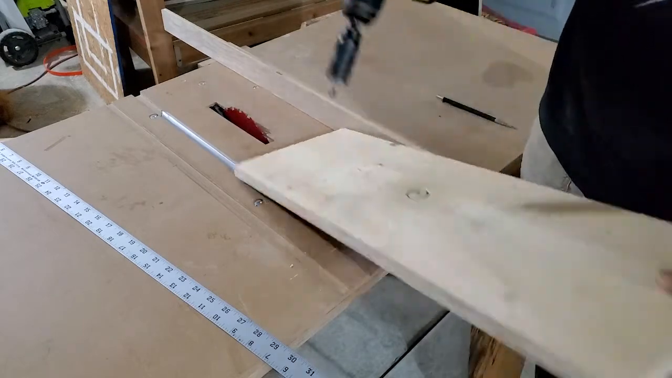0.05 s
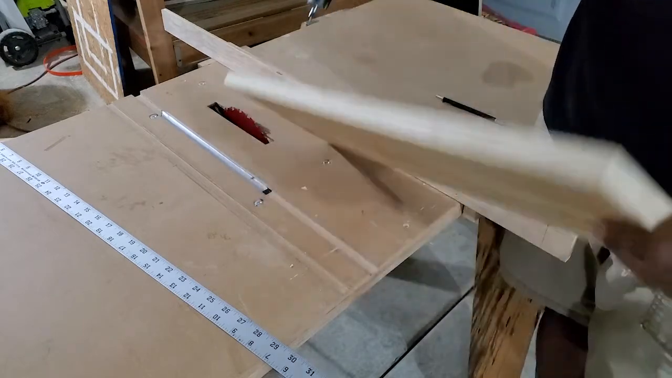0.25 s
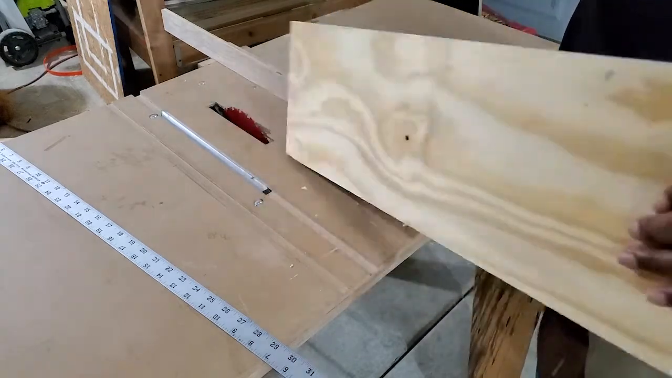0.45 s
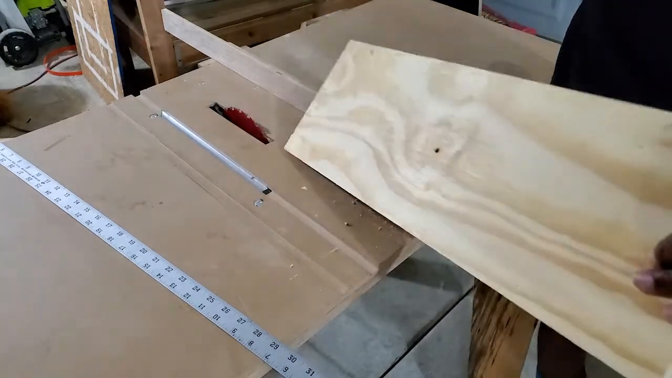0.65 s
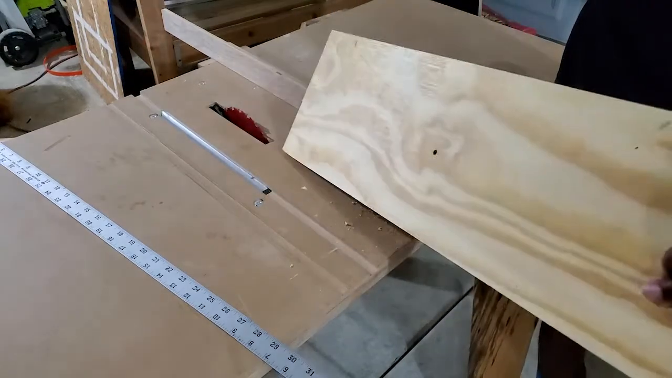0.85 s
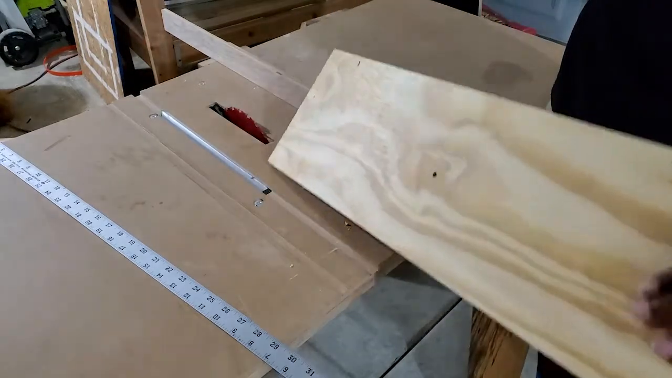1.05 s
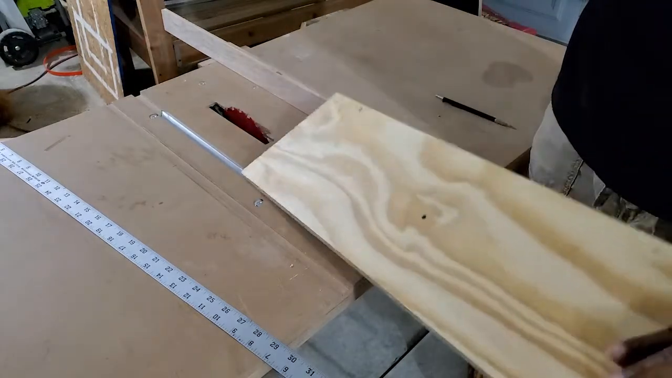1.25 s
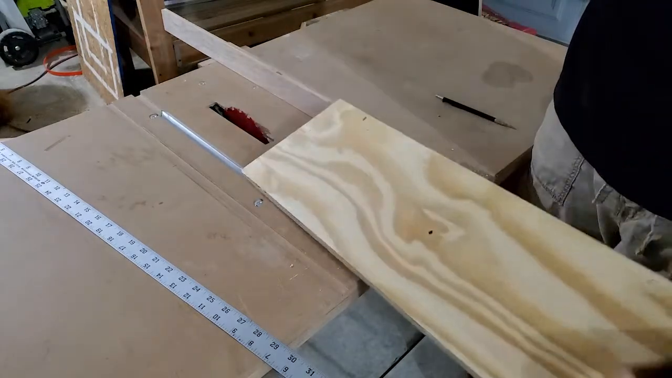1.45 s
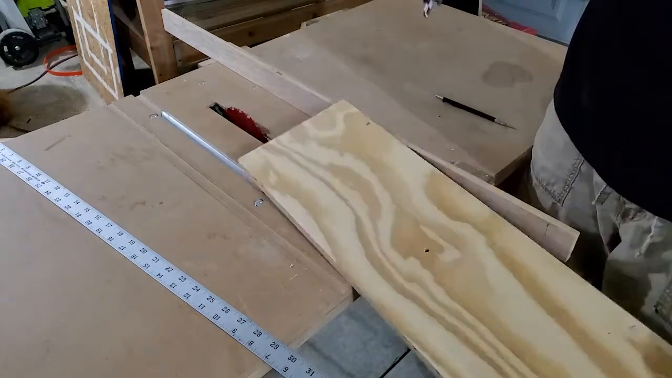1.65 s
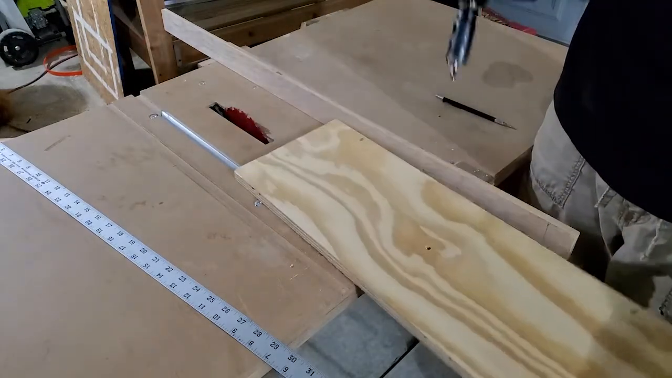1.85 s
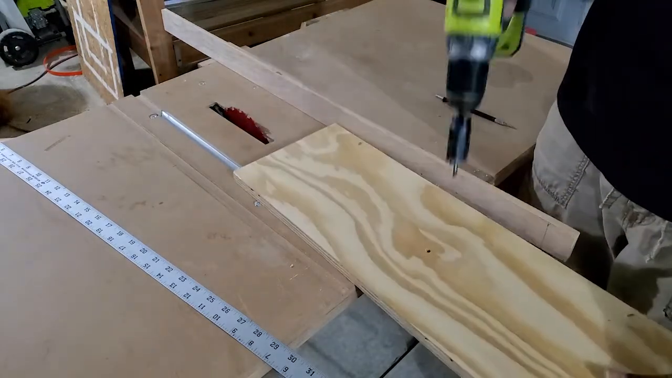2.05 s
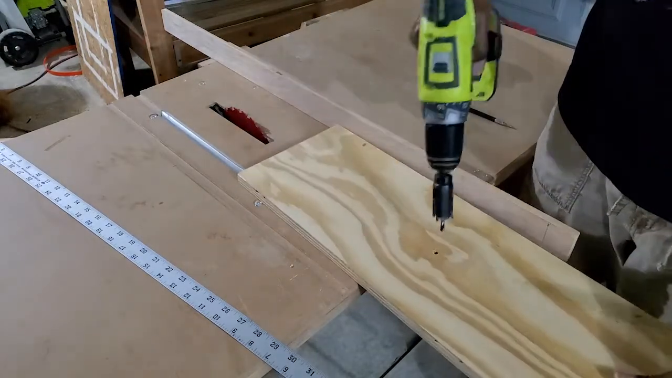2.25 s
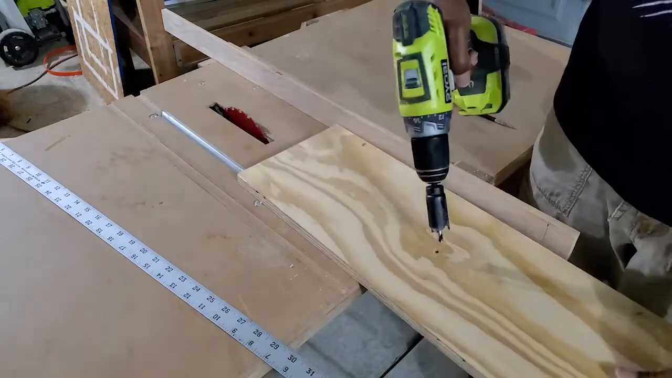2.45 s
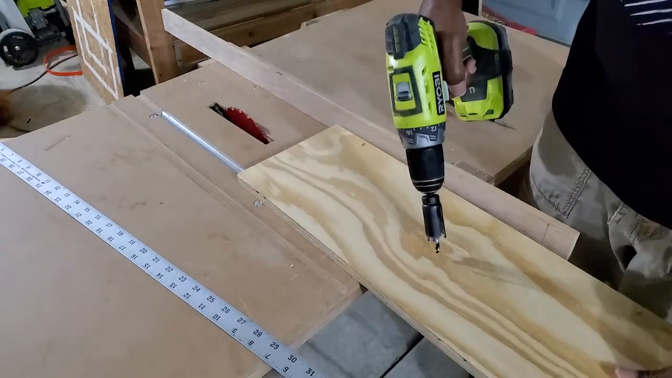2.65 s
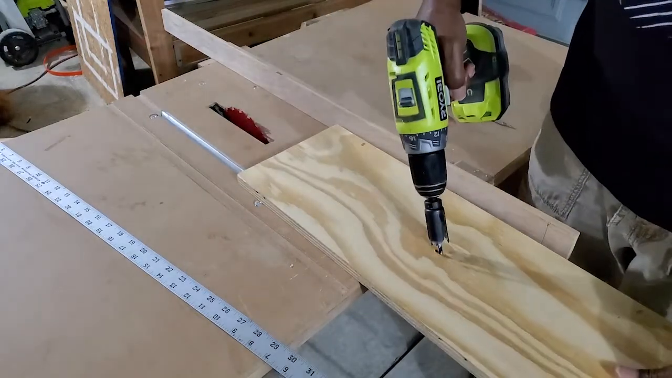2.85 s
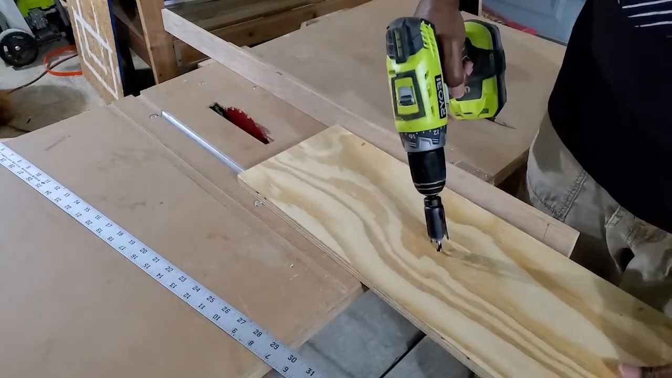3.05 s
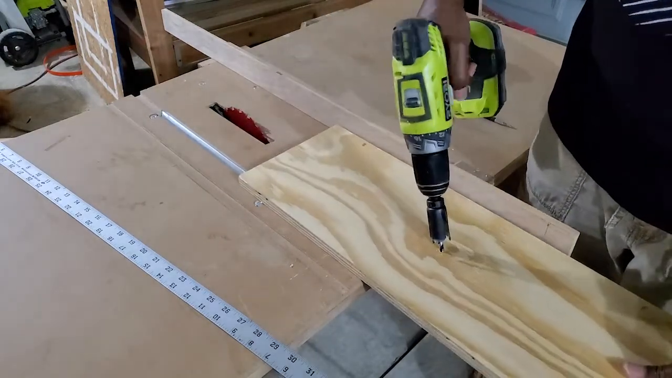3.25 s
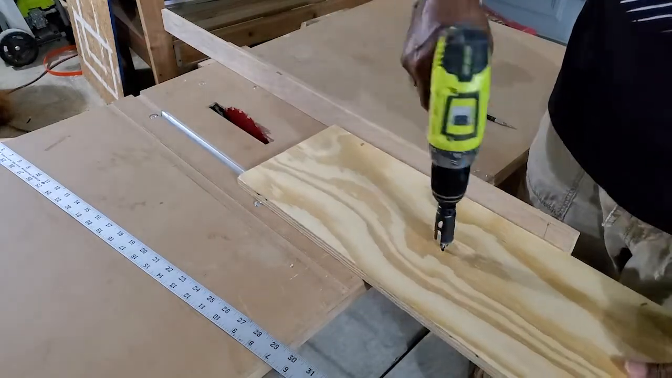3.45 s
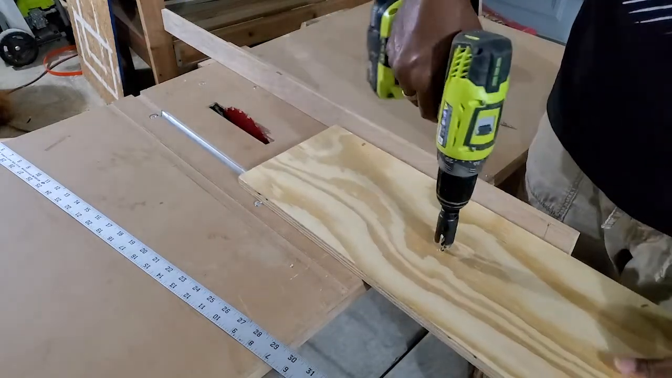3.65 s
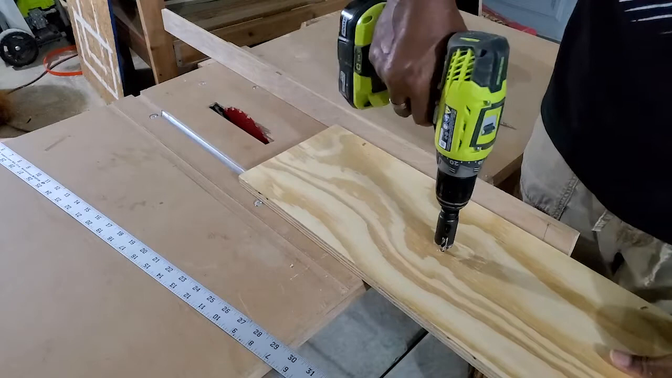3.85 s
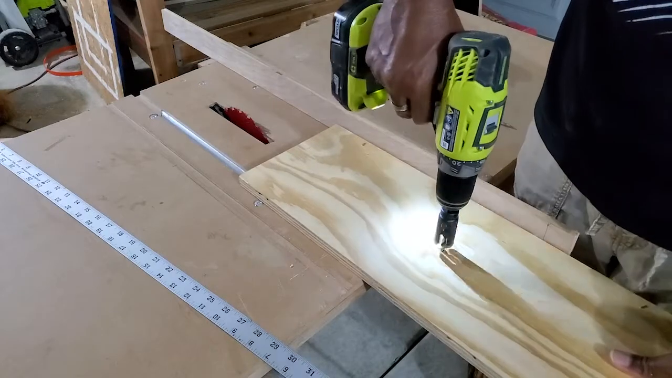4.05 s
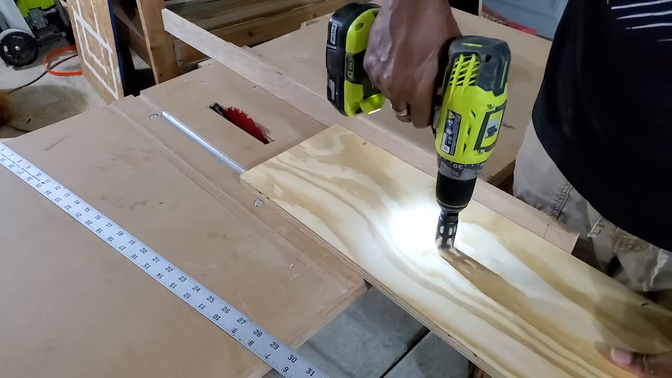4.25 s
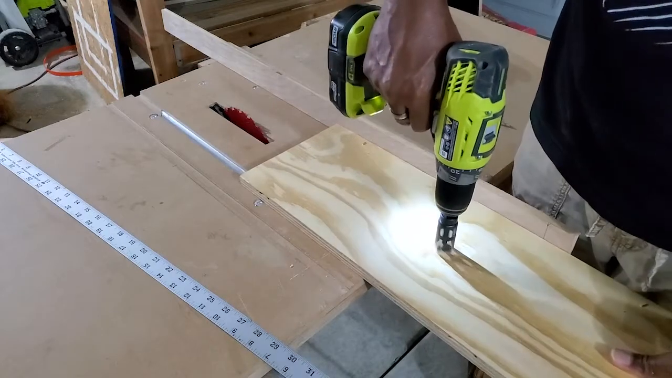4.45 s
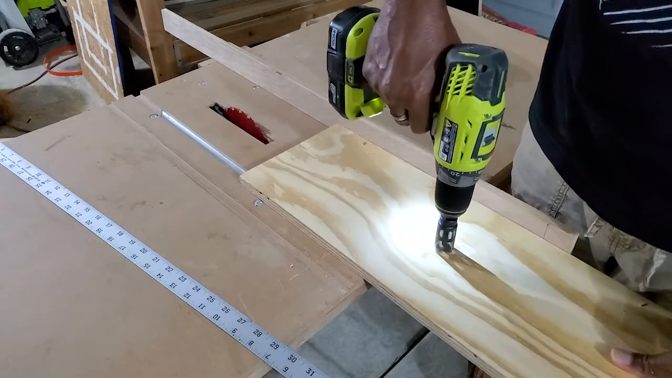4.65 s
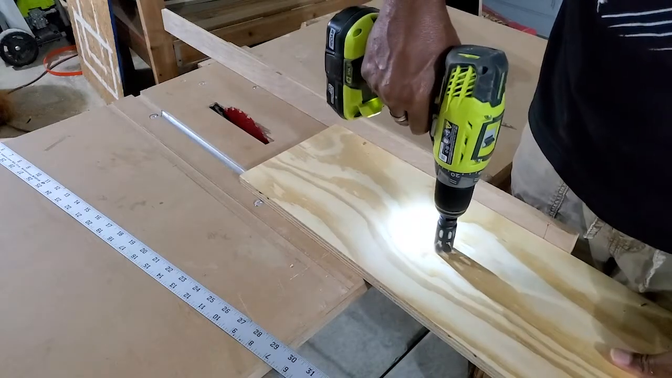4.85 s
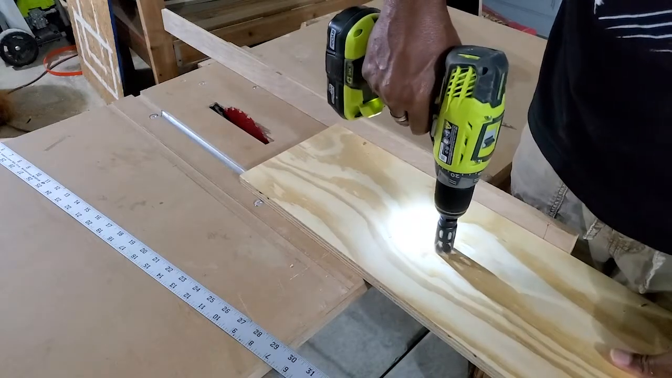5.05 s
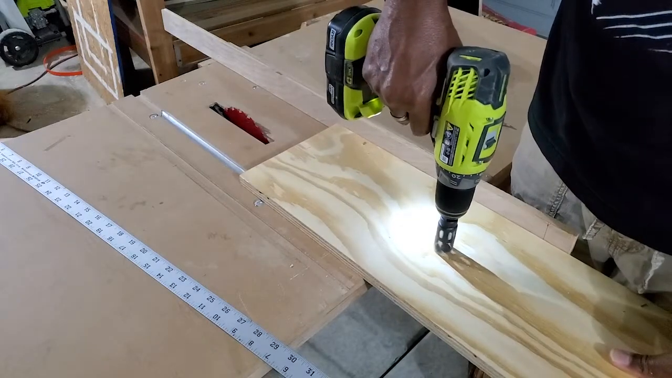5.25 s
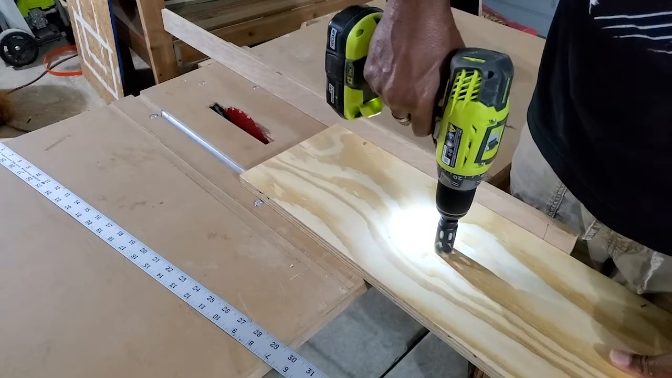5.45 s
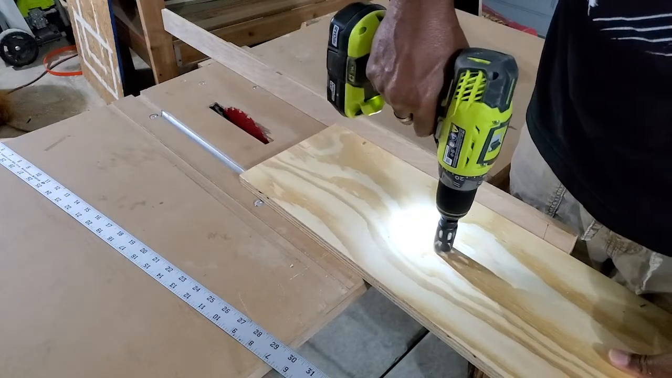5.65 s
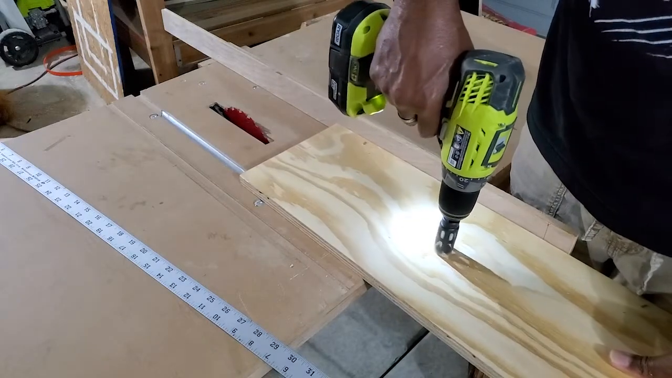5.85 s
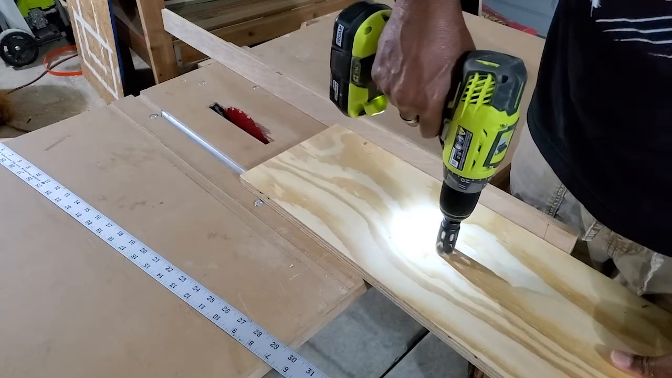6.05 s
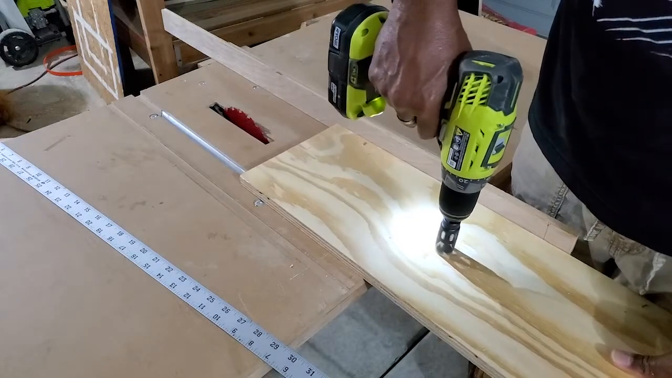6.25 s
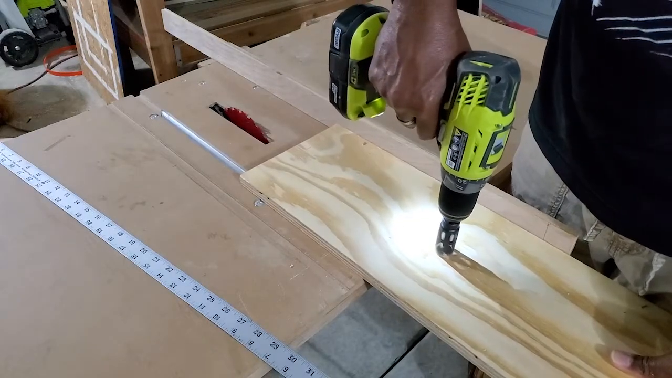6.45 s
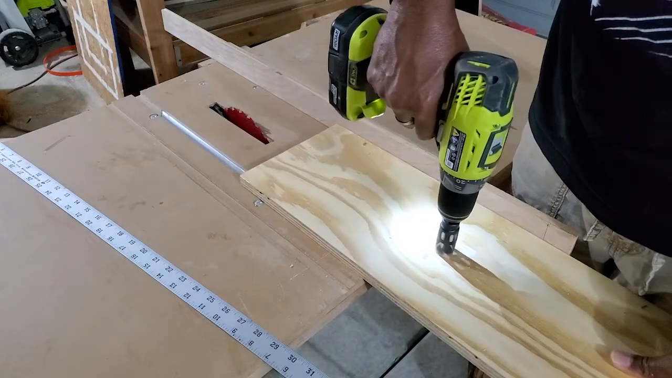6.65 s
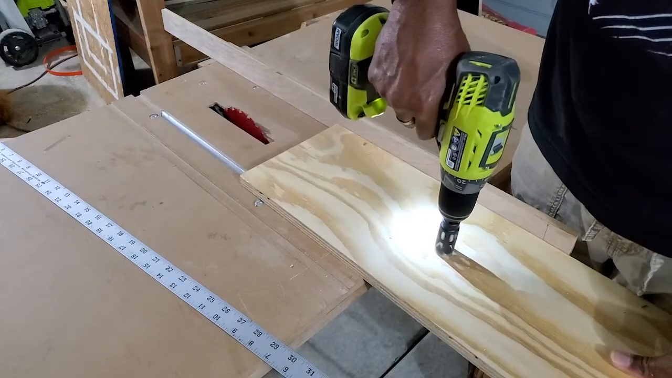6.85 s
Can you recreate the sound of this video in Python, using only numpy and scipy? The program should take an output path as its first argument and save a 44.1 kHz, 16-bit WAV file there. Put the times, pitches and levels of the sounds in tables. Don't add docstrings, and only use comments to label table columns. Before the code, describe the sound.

Wood slides, knocks and cracks down on a bench, near-quiet follows, then an electric drill whirs up and grinds steadily through the plank.

```python
import sys
import numpy as np
from scipy import signal
from scipy.fft import rfft, irfft, next_fast_len
from scipy.io import wavfile
from scipy.ndimage import uniform_filter1d, map_coordinates

SR = 44100
rng = np.random.default_rng(int(sys.argv[2]) if len(sys.argv) > 2 else 0)


def file_out(sig):
    cols = np.atleast_2d(sig).T
    lim = np.clip(cols, -1, 1)
    pcm = np.round(lim * 32767).astype(np.int16)
    wavfile.write(sys.argv[1], SR, pcm)


def amplitude_ratio(level_db):
    exponent = np.asarray(level_db, float) / 20
    return 10 ** exponent


N = 304731

# frequency in Hz, density in dB per Hz.
TRAFFIC = [(18, -63.5), (30, -39.5), (49, -7), (90, -19), (102, -7), (123, -6.5), (148, -12), (187, -5),
           (270, -19), (332, -15), (591, -22.5), (747, -28.5), (2360, -47), (2550, -47), (15500, -70)]
# frequency in Hz, level in dB.
MAINS_HUM = [(59.5, -79.5), (119, -84.5), (178.5, -69.5), (3330, -101)]
# frequency in Hz, t60 in seconds.
GARAGE = [(100, .75), (500, .52), (2000, .53), (4000, .36), (7000, .18), (14000, .2)]
# frequency in Hz, likeness from 0 to 1.
ALIKE = [(60, 0.97), (200, 1), (400, 0.54), (800, 0.051), (1500, 0.026)]

# peak in seconds, rise in seconds, fall in seconds, scrape in dB, weight in dB.
STROKES = [(.005, 0.036, 0.25, -59.5, 0.5), (0.186, 0.05, 0.19, -56.5, 14), (.237, .03, 0.11, -60, 16.5),
           (0.292, 0.107, 0.084, -39.5, -4), (.316, 0.038, 0.063, -37.5, -7),
           (.38, 0.052, 0.04, -42, -17.5), (.43, .07, .04, -52, -16), (.47, 0.068, 0.18, -60.5, -16),
           (0.841, .06, 0.029, -55.5, -12), (.96, 0.05, 0.5, -48, -15), (1.08, 0.13, 0.11, -53, -16),
           (1.012, 0.052, 0.028, -45.5, 2), (1.126, 0.21, 0.12, -53, -22.5), (1.19, 0.024, 0.055, -44, 16),
           (1.377, 0.23, 0.046, -65, 26.5), (1.54, 0.04, 0.1, -63.5, 1), (1.606, 0.022, 0.11, -44.5, 13.5),
           (1.68, .08, 0.058, -44, 5.5), (1.75, 0.033, 0.3, -55, 22.5), (1.82, 0.016, 0.018, -45, -1.5),
           (1.857, 0.06, 0.087, -47, 11), (2.041, 0.04, 0.077, -57, -9.5), (2.275, 0.028, 0.028, -76, -12),
           (2.36, .1, 0.16, -84.5, -3), (3.069, 0.029, 0.24, -76, 2), (3.31, 0.045, 0.57, -70, 0.5),
           (3.515, 0.15, 0.083, -66.5, -1.5), (3.624, 0.16, .05, -72, -2), (3.966, 0.021, 0.084, -71, -13)]
# frequency in Hz, width in Hz, level in dB.
SLIDING = [(310, 50, -7), (430, 40, 2), (720, 80, -7), (1030, 70, -5), (1210, 70, -4), (1440, 60, -2),
           (1700, 90, -4), (1930, 120, -6), (2320, 120, -4), (2900, 90, -6), (4000, 120, -6),
           (4350, 100, -8)]
# frequency in Hz, width in Hz, level in dB.
LANDED = [(245, 100, 1.5), (446, 40, -1), (689, 30, -3), (800, 30, -6.5), (1200, 87, -8.5),
          (1440, 60, -6.5), (2000, 500, -18)]
# frequency in Hz, width in Hz, level in dB.
SETTLING = [(423, 43, -3), (798, 30, -1), (1261, 120, -4), (1780, 120, -5), (2300, 250, -9),
            (3030, 200, -14), (3944, 150, -16)]
# frequency in Hz, width in Hz, level in dB.
GRIP = [(1180, 60, -7), (1840, 60, -5), (2450, 200, -2), (3450, 150, -6), (4050, 250, -10)]
# frequency in Hz, density in dB per Hz.
DUST = [(2000, -30), (3000, -9), (4000, -17), (5500, -7.5), (7000, -12.5), (8700, -27), (11500, -19),
        (13500, -17.5), (16000, -16)]
DUST_DB = [-19.5, -29, -29.5, -8.5]
# start in seconds, length in seconds, frequency in Hz, level in dB rms.
GROANS = [(.178, 0.039, 428, -47), (.215, 0.041, 423, -50.5), (.225, 0.031, 306.4, -52),
          (.265, 0.057, 427.3, -50), (.283, .025, 1460, -47), (.372, 0.019, 1420, -47),
          (.95, 0.096, 420, -59.5), (1.36, 0.084, 800, -55.5), (2.56, .15, 120, -65.5),
          (2.715, 0.16, 1847, -93), (3.445, 0.027, 1180, -75), (3.74, .02, 2064, -85)]

# time in seconds, tick peak in dB, knock peak in dB, bright edge peak in dB.
KNOCKS = [(0.2942, -37, -49, -78), (0.3842, -33, -56, -66), (0.611, -64, -61, -85),
          (0.9857, -42, -44.5, -51), (1.164, -36, -44, -67), (1.1676, -24.5, -13.5, -42.5),
          (1.1745, -44, -21.5, -71), (1.1813, -44, -27, -70.5), (1.2195, -45, -37, -69),
          (1.3232, -42, -38, -65), (1.3645, -48.5, -31, -80), (1.5155, -72, -62, -82),
          (1.587, -35.5, -16, -59), (1.6576, -42.5, -30, -52), (1.6866, -50, -33, -73.5),
          (1.7085, -35, -18, -57), (1.7439, -38.5, -31, -69), (1.7684, -39, -29, -66),
          (1.8194, -27, -32.5, -57), (1.838, -53, -34.5, -65), (1.8492, -31, -27, -58),
          (1.8774, -43, -46, -53.5), (2.709, -72, -59, -97.5), (3.056, -70, -76.5, -82),
          (3.0824, -70.5, -67.5, -94.5), (3.0994, -75.5, -82, -65.5), (3.2083, -69, -72.5, -93),
          (3.2742, -78, -80, -91), (3.2927, -72, -72.5, -81), (3.3076, -63, -75, -78),
          (3.4554, -56, -60, -86.5), (3.477, -60.5, -70.5, -89), (3.52, -63.5, -77, -67),
          (3.5441, -66, -76.5, -78), (3.644, -69, -72, -80.5), (3.7523, -70, -71.5, -97),
          (4.0022, -52, -70, -63), (4.013, -36.5, -70, -52)]
# frequency in Hz, level in dB, t60 in seconds.
BOARD_MODES = [(102.5, -20, 0.18), (170, -5.5, 0.086), (258, -14.5, 0.2), (450.5, 6, 0.1), (588, 3.5, 0.16),
               (695, -1, 0.35), (765, -2, 0.15), (1300, -4.5, 0.17)]
# frequency in Hz, level in dB, t60 in seconds.
FLAT_MODES = [(105.6, -5, 0.23), (151, -6, 0.12), (233, 1, 0.11), (352, -7.5, .15), (440, 10.5, 0.066),
              (563, -4.5, 0.41), (689, -2.5, .2), (820, -11.5, .15), (1250, -15, .12)]
# time in seconds, frequency in Hz, peak in dB; then the peak in dB of a brief sharp
CLACK = (1.78923, 2100, -10, -10)
# frequency in Hz, level in dB, t60 in seconds.
CLACK_RING = (1800, -27.5, .04)

# time in seconds, motor effort in dB, feed pressure in dB.
BORE = [(3.99, -82, -75), (4.012, -51.5, -55), (4.07, -45.5, -59), (4.18, -45, -47.5), (4.3, -37.5, -59),
        (4.4, -39, -65.5), (4.6, -40.5, -60), (4.8, -37.5, -48.5), (5.05, -37.5, -44.5), (5.15, -37, -38.5),
        (5.45, -35.5, -39.5), (5.75, -36.5, -41.5), (5.93, -37, -46.5), (6.05, -36, -39), (6.3, -35, -35),
        (6.6, -35, -34.5), (6.91, -34.5, -33.5)]
# time in seconds, base order in Hz.
GEARS = [(4.26, 590), (4.31, 635), (4.38, 667), (4.45, 615), (4.55, 535), (4.67, 480), (4.7, 605),
         (4.78, 655), (4.92, 683), (5.05, 680), (5.35, 662), (5.5, 652), (5.7, 652), (5.9, 666),
         (6.05, 667), (6.4, 662), (6.91, 644)]
# time in seconds, frequency in Hz, level in dB.
SQUEAL = [
    (4.09, 3720, -62),
    (4.14, 4000, -52),
    (4.175, 4310, -48),
    (4.22, 4420, -51),
    (4.245, 4500, -68),
]
# frequency in Hz, density in dB per Hz.
HISS = [(1470, -8.5), (1900, -2.5), (2500, -4), (3020, -3.5), (3680, -4), (4110, 2), (5330, -4.5),
        (6550, -2.5), (8370, -4), (9720, -6), (13500, -3.5), (15400, -6), (16100, -37), (16500, -46.5)]
# frequency in Hz, width in Hz, level in dB.
HOUSING = [(4070, 200, -6), (4350, 500, -7), (9870, 110, 0), (11860, 900, -14.5)]
# frequency in Hz, width in Hz, share taken away in dB.
HOUSING_GAP = (3820, 260, -5)
SPIN_UP_S = (4.01, 4.14)
# frequency in Hz, density in dB per Hz.
RASP = [(150, -39), (250, 15.5), (420, 7), (530, -10), (592, -6), (746, -8.5), (1870, -3.5), (3500, -10.5),
        (4550, -34), (7700, -120)]
# frequency in Hz, density in dB per Hz.
THRUM = [(18, -40), (30, -27), (76, -24), (146, 2), (231, -30), (300, -5), (390, 7), (660, -120)]
# multiple of the chuck turn, level in dB.
SHALLOW = [(1, -33), (2, -25), (3, -6), (4, -11), (5, -14), (6, -8), (7, -10), (8, -11), (9, -15),
           (10, -20), (11, -17), (12, -18), (13, -14), (14, -14), (15, -13), (16, -1), (17, -10), (18, -3),
           (19, 0), (20, -3), (21, -7), (22, -19), (23, -14), (24, -19), (25, -7), (26, -7), (27, -13),
           (28, -16), (29, -20), (30, -18)]
# multiple of the chuck turn, level in dB.
DEEP = [(1, -40), (2, -15), (3, -10), (4, -19), (5, -11), (6, 0), (7, -11), (8, -11), (9, -10), (10, -10),
        (11, -22), (12, -19), (13, -18), (14, -17), (15, -8), (16, -9), (17, -13), (18, -3), (19, -11),
        (20, -14), (21, -10), (22, -24), (23, -19), (24, -23), (25, -14), (26, -5), (27, -16), (28, -24),
        (29, -20), (30, -21)]
# frequency in Hz, width in Hz, level in dB.
PLANK = [(420, 90, -4), (600, 40, -6), (790, 25, -7), (1023, 35, -3), (1350, 55, -7), (1690, 90, -8),
         (1875, 130, -2), (2155, 45, -6), (2660, 150, -10)]
# peak in seconds, rise in seconds, fall in seconds, level in dB.
SHUDDERS = [
    (4.14, 0.038, 0.085, -42),
    (4.81, 0.17, 0.16, -45.5),
    (5.15, 1, 0.45, -44.5),
    (5.7, 0.24, 0.42, -45.5),
    (6.3, 0.41, 0.6, -35.5),
    (6.57, 0.47, 0.26, -36),
]
# start in seconds, length in seconds, frequency in Hz, level in dB rms.
LOCKS = [(4.98, 0.26, 69.5, -51), (5.05, 0.21, 472, -45), (5.08, 0.22, 372, -48.5), (5.15, 0.16, 445, -44),
         (5.33, 0.16, 426, -44), (5.24, 0.19, 605, -47.5), (5.56, 0.23, 415, -48), (5.98, .17, 370, -45.5),
         (5.98, 0.11, 418.5, -47), (6.0, 0.44, 600, -49), (6.14, 0.28, 138.4, -38.5),
         (6.44, .25, 138.4, -39), (6.33, 0.42, 69.2, -46), (5.62, .5, 47, -57), (6.35, .45, 46, -56),
         (6.22, 0.3, 415, -40.5), (6.36, .4, 230, -46), (6.52, 0.1, 366, -42), (6.66, 0.16, 480, -44.5),
         (6.74, 0.25, 405, -47)]
# time in seconds, peak in dB.
SNAGS = [(4.63, -28), (5.089, -30), (5.135, -29), (5.176, -29), (5.218, -33), (5.287, -31), (5.352, -32),
         (5.439, -30), (5.5, -31), (5.639, -16.5), (5.686, -20), (5.73, -25), (5.771, -24), (5.817, -28),
         (5.902, -28), (5.986, -33), (6.031, -27), (6.113, -25), (6.29, -33), (6.384, -33), (6.497, -27),
         (6.632, -29), (6.737, -29), (6.785, -37), (6.847, -26), (6.888, -36)]
# frequency in Hz, level in dB, t60 in seconds.
SNAG_RING = [(420, 0, .06), (470, -5, .05), (365, -9, .05)]
# frequency in Hz, width in Hz, share taken away in dB.
PORT_DIP = (8500, 2400, -11)


def unit(x):
    return x / np.sqrt(np.mean(x ** 2) + 1e-20)


def along(points, hz):
    f, v = np.transpose(points)
    return np.interp(np.log(hz + 1), np.log(f + 1), v)


def spectrum(points):
    return lambda f: amplitude_ratio(along(points, f))


def curves(rows):
    s, *cols = np.transpose(rows)
    return [np.interp(np.arange(N) / SR, s, c) for c in cols]


def during(rows):
    t = np.arange(N) / SR
    return np.clip(np.minimum(t - rows[0][0], rows[-1][0] + .01 - t) * 200, 0, 1)


def wobble(rate):
    knots = rng.standard_normal(int(N * rate / SR) + 4)
    return map_coordinates(knots, [np.arange(N) * rate / SR], order=1)


def swells(rows):
    t = np.arange(N) / SR
    return np.sqrt(sum(amplitude_ratio(2 * db - 40 * np.maximum((s - t) / rise, (t - s) / fall))
                       for s, rise, fall, db in rows))


def filtered(x, response):
    m = next_fast_len(x.shape[-1] + SR // 2)
    return irfft(rfft(x, m) * response(np.fft.rfftfreq(m, 1 / SR)), m)[..., :x.shape[-1]]


def resonances(peaks, base=0):
    def response(f):
        power = sum(amplitude_ratio(2 * db) * (f * w) ** 2 / ((c * c - f * f) ** 2 + (f * w) ** 2) for c, w, db in peaks)
        return np.sqrt(base ** 2 + power)
    return response


def band(lo_hz, hi_hz):
    return lambda f: 1 / np.sqrt((1 + (lo_hz / (f + 1)) ** 4) * (1 + (f / hi_hz) ** 4))


def noise(*responses, gate=1):
    raw = gate * rng.standard_normal(N)
    return unit(filtered(raw, lambda f: np.prod([r(f) for r in responses], axis=0)))


def hums(rows, edge_s, waver):
    t, rate = np.arange(N) / SR, 1 / edge_s / 2
    out = np.zeros(N)
    for s, length, hz, db in rows:
        inside = np.clip(np.minimum(t - s, s + length - t) / edge_s + .5, 0, 1)
        swell = amplitude_ratio(db + 2 + 1.2 * wobble(rate)) * np.sin(np.pi / 2 * inside) ** 2
        out += swell * np.sin(2 * np.pi * hz * t + waver * wobble(rate))
    return out


def diffuse(pair):
    turn = lambda hz: np.arccos(np.clip(along(ALIKE, hz), -1, 1)) / 2
    mid, side = filtered(pair, lambda hz: np.array([np.cos(turn(hz)), np.sin(turn(hz))]))
    return np.array([mid + side, mid - side])


def garage(x, wet_db, lag_s, pan_db, count=1):
    turn_s = .3
    out = filtered(x, lambda f: np.exp(-1j * np.pi * f * lag_s * np.array([[1], [-1]])))
    out = out * amplitude_ratio([[pan_db / 2], [-pan_db / 2]])
    for k in range(count):
        hz, t, z = signal.stft(rng.standard_normal((2, SR)), SR, nperseg=256)
        decay = amplitude_ratio(-60 * t / along(GARAGE, hz)[:, None])
        tail = diffuse(signal.istft(z * decay, SR, nperseg=256)[1])
        tail = np.pad(tail / np.linalg.norm(tail[0]), ((0, 0), (180, 0)))
        away = np.abs((np.arange(N) / SR / turn_s - k) % count - 1)
        turn = np.cos(np.pi / 2 * np.clip(away, 0, 1)) if count > 1 else 1
        out = out + amplitude_ratio(wet_db) * signal.fftconvolve((turn * x)[None], tail, axes=1)[:, :N]
    return out


def rocking(x, depth_db):
    z = signal.stft(x, nperseg=512)[2]
    field = uniform_filter1d(rng.standard_normal(z.shape[1:]), size=3, axis=0)
    field = uniform_filter1d(field, size=5, axis=1)
    gain = amplitude_ratio(depth_db * unit(field) - depth_db ** 2 * np.log(10) / 20)
    return signal.istft(z * gain, nperseg=512)[1][:, :N]


def street():
    near_db, far_db, leaves_s, fade_s = -61, -66, 1.2, 0.93
    pair = np.array([noise(spectrum(TRAFFIC), resonances([(5870, 1300, 2)], base=0.7)) for _ in "LR"])
    hum = sum(amplitude_ratio(db + 1.1 * wobble(0.84)) * np.sin(2 * np.pi * hz * np.arange(N) / SR)
              for hz, db in MAINS_HUM)
    level_db, = curves([(leaves_s, near_db), (leaves_s + fade_s, far_db)])
    return amplitude_ratio(level_db + 2 + 2 * wobble(8)) * unit(diffuse(pair)) + hum


def slides():
    dust_drops, boom_db, shuffle_db = 0.9, -3.5, -85.5
    layer = lambda per_db: swells([(s, rise, fall, db + per_db * weight_db)
                                   for s, rise, fall, db, weight_db in STROKES])
    grit = amplitude_ratio(3 * wobble(300) + 2.5 * wobble(40))
    lumps = amplitude_ratio(4 * wobble(60))
    stage = np.searchsorted([1.16 * SR, 1.55 * SR, 2.15 * SR], np.arange(N))
    body = np.choose(stage, [noise(resonances(p, base=.15), band(200, 1100), band(170, 1100), gate=lumps)
                             for p in (SLIDING, LANDED, SETTLING, SETTLING)])
    scrape = np.choose(stage, [noise(resonances(p, base=.25), band(900, 8000), band(1, 5600), gate=grit ** 1.3)
                               for p in (SLIDING, LANDED, SETTLING, GRIP)])
    dust = amplitude_ratio(DUST_DB)[stage] * noise(spectrum(DUST), band(3000, 20000), gate=grit)
    on_bench = (stage == 1) | (stage == 2)
    boom = on_bench * amplitude_ratio(boom_db) * noise(band(55, 280), band(55, 280))
    heavy = layer(0.9)
    wood = (heavy + amplitude_ratio(shuffle_db)) * body + heavy * boom + layer(0) * scrape
    return amplitude_ratio(-2.0) * wood + layer(-dust_drops) * dust


def knocks():
    blow_db, blow_s = 8, .003
    out, t = np.zeros((2, N + SR)), np.arange(SR // 4) / SR
    peak = lambda db, x: amplitude_ratio(db) * x / np.abs(x).max()
    for s, tick_db, knock_db, edge_db in KNOCKS:
        modes = FLAT_MODES if 1.1 < s < 1.5 else BOARD_MODES
        ring = sum(amplitude_ratio(db + 2 * rng.standard_normal() - 60 * t / (0.37 * t60)) * np.sin(2 * np.pi * hz * t)
                   for hz, db, t60 in modes)
        burst = 2.9 * amplitude_ratio(-60 * t / 0.051) * rng.standard_normal(len(t))
        ring = ring + filtered(burst, lambda f: band(350, 1100)(f) ** 2)
        ring = ring * (1 + amplitude_ratio(blow_db) * np.exp(-(t / blow_s) ** 2))
        thud = peak(knock_db + 1.5, -ring * (1 - np.exp(-t / 0.0026)))
        touched = SLIDING if s < 1.1 else SETTLING if s < 2.15 else GRIP
        body = resonances([(hz, 3 * width, db) for hz, width, db in touched], base=.2)
        grit = amplitude_ratio(-60 * t / np.array([[.02], [.006]])) * rng.standard_normal((2, len(t)))
        tick = peak(tick_db - 1.5, filtered(grit[0], lambda f: band(900, 4500)(f) ** 2 * body(f)))
        edge = peak(edge_db + 5.5, filtered(grit[1], band(3500, 13000)))
        out[:, round(s * SR):][:, :len(t)] += [thud, tick + edge]
    return out[:, :N]


def clack():
    falls = 1400000
    s, hz, db, spike_db = CLACK
    t = np.arange(N) / SR - s
    chirp = np.cos(2 * np.pi * (hz * t - falls * np.clip(t, -.001, .0004) ** 2))
    wood = -amplitude_ratio(db) * np.exp(-(t / .00036) ** 2) * chirp
    ring_hz, ring_db, t60 = CLACK_RING
    after = np.clip(t - .0015, 0, None)
    wood = wood + amplitude_ratio(ring_db - 60 * after / t60) * np.sin(2 * np.pi * ring_hz * after)
    click = 1. * (np.arange(N) == round(s * SR))
    spike = filtered(click, lambda f: band(2400, 20000)(f) / np.sqrt(1 + (f / 12000) ** 40))
    spike = amplitude_ratio(spike_db) * spike / spike.max() * [[.06], [1]]
    return garage(wood, wet_db=-12, lag_s=.00003, pan_db=0) + spike


def touch():
    t = np.clip(np.arange(N) / SR - 2.708, 0, None)
    return amplitude_ratio(-48 - 60 * t / .12) * np.sin(2 * np.pi * 200 * t)


def housing_hiss(beat):
    load, = curves([(4.62, 0.45), (4.8, 0.7), (5.5, 0.91)])
    free = noise(spectrum(HISS), lambda f: 1 - 0.73 * np.abs(resonances([(4200, 700, 0)])(f)))
    gap = lambda f: 1 - np.abs(resonances([HOUSING_GAP])(f))
    ringing = noise(spectrum(HISS), resonances(HOUSING, base=0.36), gap, gate=beat ** 0.37)
    hiss = load * ringing + np.sqrt(np.abs(1 - load ** 2)) * free
    low = filtered(hiss, band(0.89, 4500))
    high_db, = curves([(SPIN_UP_S[0], -12), (SPIN_UP_S[1], 0)])
    return low + (hiss - low) * amplitude_ratio(high_db)


def chip_rasp(beat):
    return noise(spectrum(RASP), band(800, 2800), resonances(PLANK, base=.35), gate=beat ** .7)


def bit_in_board(turn, beat):
    depth, = curves([(5.6, 0.025), (6.1, 0.61)])
    orders = [amplitude_ratio(db + depth * (deep_db - db) + 2.5 * wobble(5)) * np.sin(k * turn + wobble(5))
              for (k, db), (_, deep_db) in zip(SHALLOW, DEEP)]
    thrum = 0.53 * unit(sum(orders[:13])) + 0.25 * noise(spectrum(THRUM))
    tearing = noise(resonances(PLANK, base=.12), band(310, 700), gate=beat)
    return thrum, .8 * unit(sum(orders[13:])) + .6 * tearing


def squeal():
    hz, db = curves(SQUEAL)
    phase = 2 * np.pi * np.cumsum(hz) / SR
    upper = np.clip((hz - 3900) / 150, 0, 1) * np.sin(phase)
    return during(SQUEAL) * amplitude_ratio(db + 6.5) * (upper + 1.6 * np.sin(.528 * phase))


def gear_whine(base_hz, shaft, effort_db):
    tone = lambda k, db: (amplitude_ratio(effort_db + db + 0.37 * wobble(4.5))
                          * np.sin(k * shaft + .5 * wobble(30) + 16 / k ** 2 * wobble(150)))
    mesh = sum(tone(k, db) for k, db in [(2, -21), (4, -22), (6, -26), (10, -10.5), (16, -22), (18, -22)])
    mesh = mesh * np.clip(base_hz / 650, 0, 1) ** 4
    share = .7 * np.clip((np.arange(N) / SR - 5.0) / .6, 0, 1)
    fan = share * tone(14.5, -13) + (1 - share) * tone(15, -13)
    return during(GEARS) * (mesh + fan)


def snags():
    out, t = np.zeros(N + SR), np.arange(SR // 8) / SR
    for (s, db), chance in zip(SNAGS, rng.standard_normal((len(SNAGS), 3))):
        ring = sum(amplitude_ratio(level + c - 60 * t / t60) * np.sin(2 * np.pi * hz * t)
                   for (hz, level, t60), c in zip(SNAG_RING, chance))
        out[round(s * SR):][:len(t)] += amplitude_ratio(db - 2.5) * ring * (1 - np.exp(-t / 0.004))
    return out[:N]


def drill():
    base_hz, = curves(GEARS)
    effort_db, feed_db = curves(BORE)
    shaft = 2 * np.pi * np.cumsum(base_hz) / SR
    turn = shaft / 28.6
    beat = amplitude_ratio(2.5 * np.cos(turn) + 3.5 * np.cos(2 * turn + wobble(4.6))
               + 2.1 * np.cos(3 * turn + wobble(2.1)) + 0.76 * wobble(30))
    rasp_db = effort_db - 6 + 0.33 * (feed_db + 41.5)
    cutting = amplitude_ratio(rasp_db) * chip_rasp(beat) + amplitude_ratio(effort_db) * housing_hiss(beat)
    air = during(BORE) * cutting + gear_whine(base_hz, shaft, effort_db)
    thrum, bite = bit_in_board(turn, beat)
    shake = amplitude_ratio(-49.5 + (feed_db + 37.0)) + swells(SHUDDERS)
    bench = during(BORE) * (shake * thrum + amplitude_ratio(feed_db - 2) * bite)
    return air, bench + squeal() + hums(LOCKS, edge_s=.05, waver=0.65) + snags()


def scene():
    handling = amplitude_ratio(-3.0) * slides() + touch() + hums(GROANS, edge_s=.015, waver=1.1)
    handling = rocking(garage(handling, wet_db=-4.0, lag_s=.0001, pan_db=-1.5), depth_db=2)
    thuds, ticks = knocks()
    bench = garage(thuds, wet_db=-6.0, lag_s=.00004, pan_db=0.5)
    bench = bench + garage(ticks, wet_db=-1.0, lag_s=.0001, pan_db=12.5) + clack()
    tool, thrum = drill()
    boring = rocking(garage(tool, wet_db=1.0, lag_s=.00018, pan_db=-2.0, count=5), depth_db=1.5)
    boring += garage(thrum, wet_db=-14, lag_s=.00018, pan_db=-.3)
    return street() + handling + bench + boring


def roll_off(x):
    return signal.sosfilt(signal.butter(12, 16970, fs=SR, output="sos"), x)


def record(dry):
    top_hz, bass_hz = 15830, 42
    port = lambda f: 1 - np.abs(resonances([PORT_DIP])(f))
    heard = filtered(dry, lambda f: (f < top_hz) * port(f) / np.sqrt(1 + (bass_hz / (f + 1)) ** 12))
    return roll_off(heard)


dry = scene()
out = record(dry)
file_out(out)
```